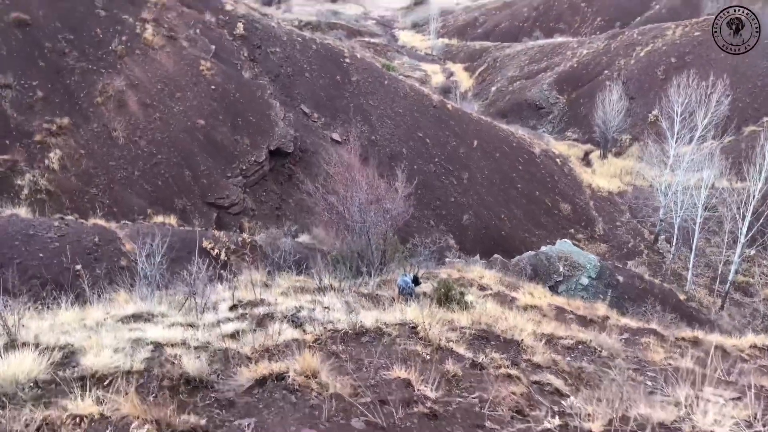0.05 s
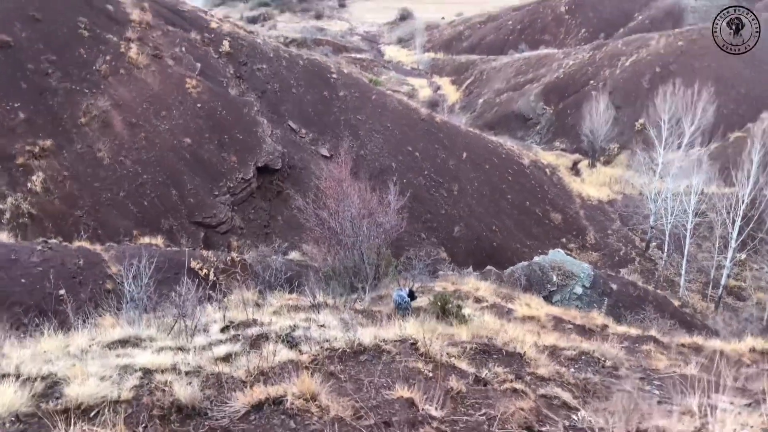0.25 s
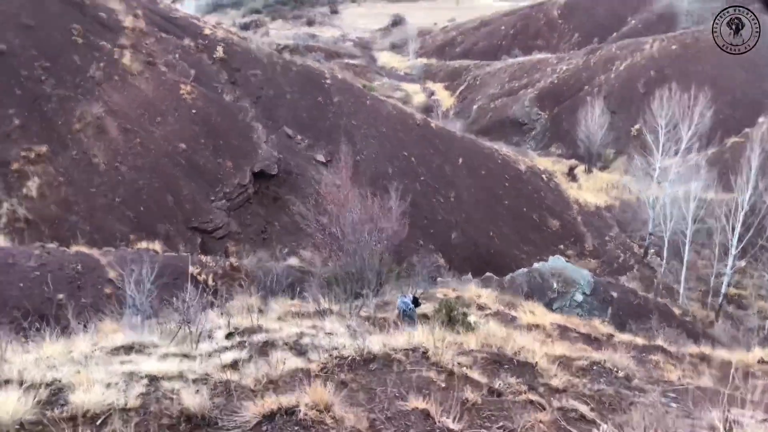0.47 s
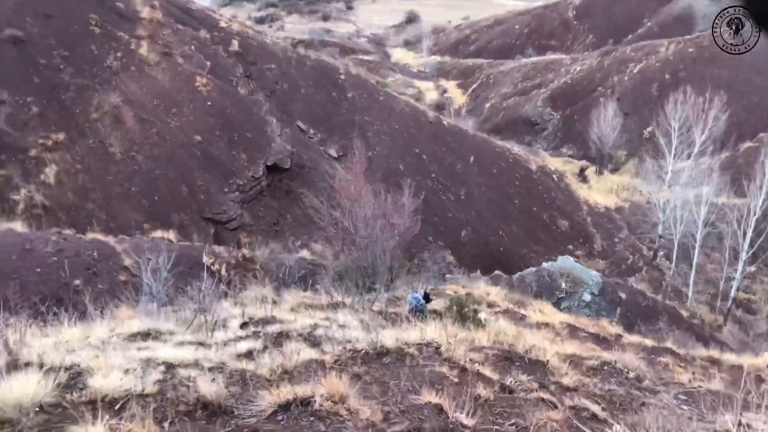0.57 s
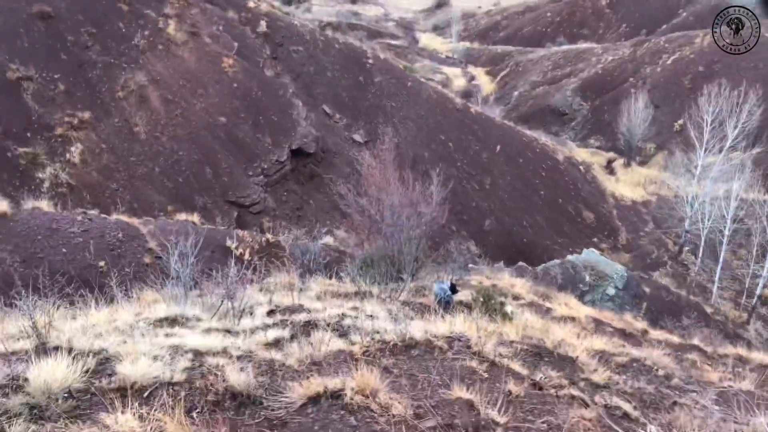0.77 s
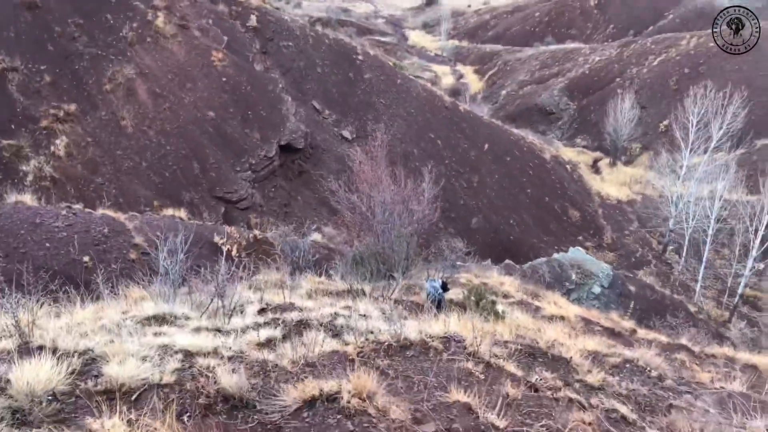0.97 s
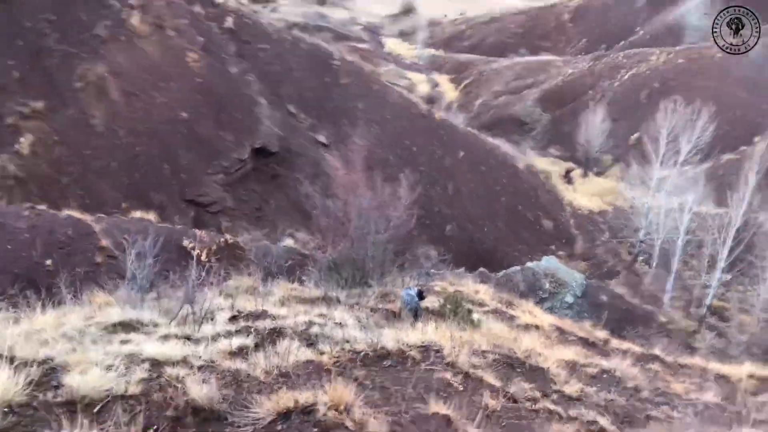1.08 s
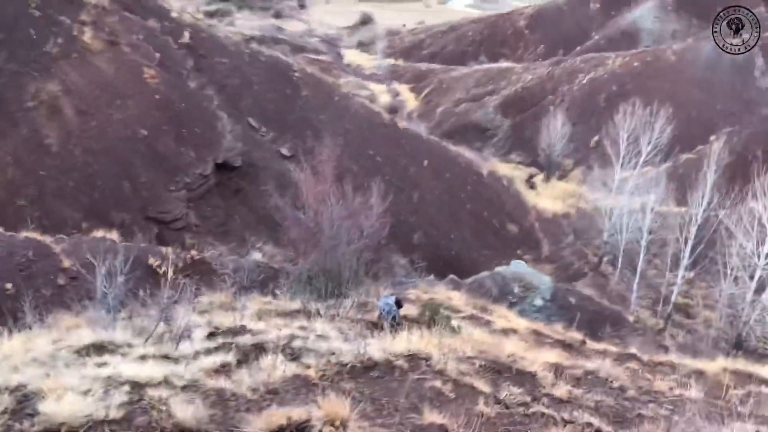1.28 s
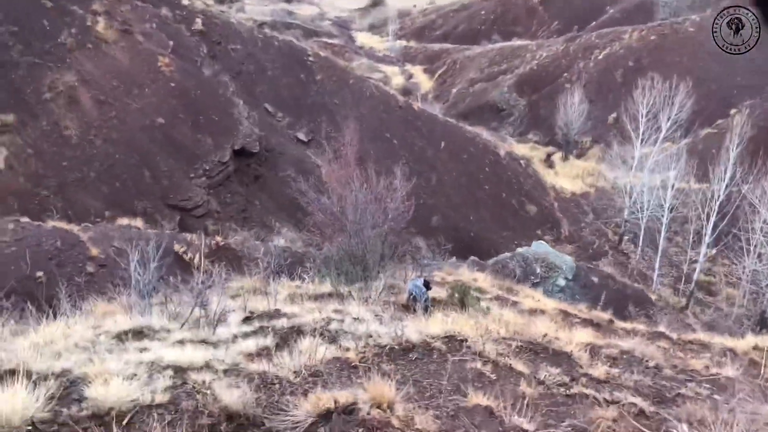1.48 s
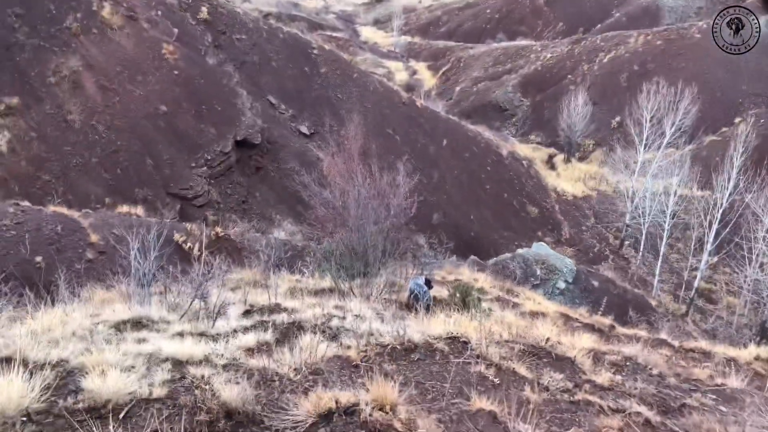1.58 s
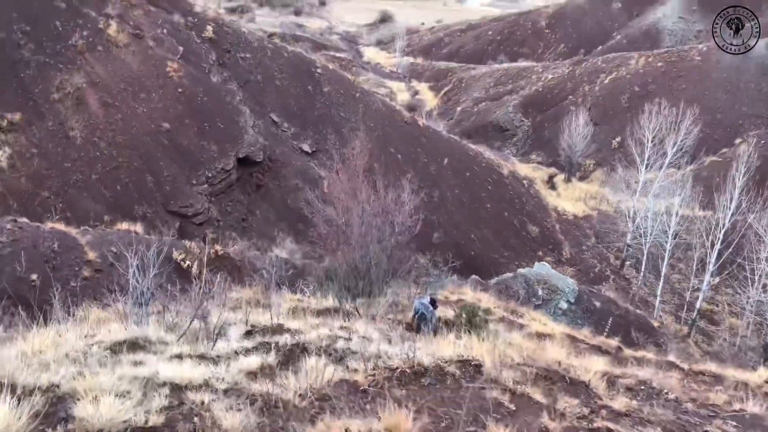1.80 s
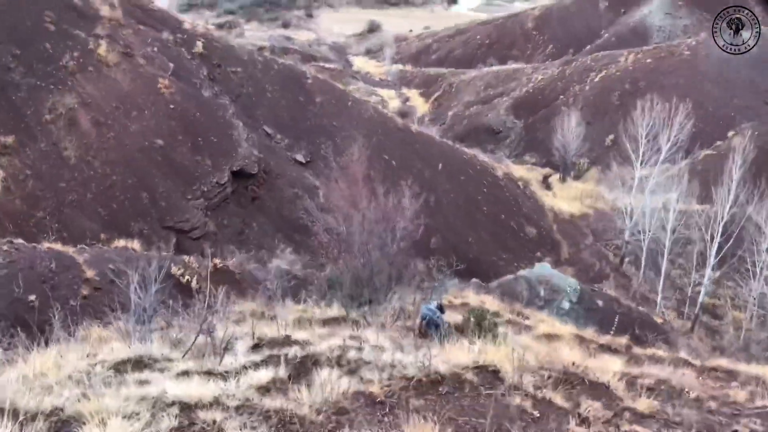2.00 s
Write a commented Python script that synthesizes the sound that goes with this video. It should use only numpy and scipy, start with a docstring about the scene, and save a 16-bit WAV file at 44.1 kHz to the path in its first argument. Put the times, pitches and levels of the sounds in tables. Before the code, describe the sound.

Light wind buffets the microphone and dies away, with faint ticks of dry grass.

```python
"""A dry, grassy hillside, one microphone in faint open air.
A light gust buffets the microphone: each eddy is a soft thump that falls in pitch, over a low rumble
and flutter, and the wind then dies away. Close by, as if under shifting feet, dry stalks snap in
short ticks, and grass and grit rustle with dense grains of tiny fractures."""
import sys
import numpy as np
from scipy import signal
from scipy.fft import rfft, irfft
from scipy.io import wavfile
from scipy.ndimage import uniform_filter1d

SR = 44100
rng = np.random.default_rng(int(sys.argv[2]) if len(sys.argv) > 2 else 0)


def master_out(mix):
    """Clip the mix to full scale and print it as 16-bit PCM to the path in sys.argv[1]."""
    frames = np.transpose(np.atleast_2d(mix))
    ceiling = np.clip(frames, -1, 1)
    pcm = np.round(ceiling * 32767).astype(np.int16)
    wavfile.write(sys.argv[1], SR, pcm)


N = 90404

# spectrum of dry grass breaking close to the microphone: frequency_hz, density_db
GRASS_SPECTRUM = [(200, -7.5), (600, 3), (1300, 1), (2000, -3.5), (3500, -1), (5000, -3.5), (8000, -6),
                  (11000, -12), (16000, -25)]
# rise and fall of the fine crackle: time_s, level_db
CRACKLE_LEVEL = [(0, -62), (.3, -62.5), (.45, -67), (.62, -69), (.85, -70), (1.02, -74.5), (1.07, -65),
                 (1.2, -67), (1.3, -72), (1.42, -64.5), (1.6, -69.5), (1.85, -67), (2.05, -69.5)]


def undb(db):
    """Decibels to gain."""
    return 10 ** (np.asarray(db) / 20)


def unit(x):
    """Scale to rms 1."""
    return x / np.sqrt(np.mean(x ** 2))


def curve(rows):
    """Gain over time from rows of time_s, level_db."""
    time_s, level_db = np.array(rows).T
    return undb(np.interp(np.arange(N) / SR, time_s, level_db))


def colour(x, rows):
    """Filter by rows of frequency_hz, density_db, then scale to rms 1."""
    hz, db = np.array(rows).T
    bins_hz = np.maximum(np.arange(N // 2 + 1) * SR / N, 1)
    gain = undb(np.interp(np.log(bins_hz), np.log(hz), db))
    return unit(irfft(rfft(x) * gain, N))


def wander(rate_hz):
    """Smooth random drift of rms 1."""
    hold = int(SR / rate_hz)
    steps = np.repeat(rng.standard_normal(N // hold + 1), hold)
    return unit(uniform_filter1d(steps, hold)[:N])


def add(out, at_s, sound):
    """Mix in a sound centred on a time."""
    i = int(round(at_s * SR)) - len(sound) // 2 + np.arange(len(sound))
    inside = (i >= 0) & (i < N)
    out[i[inside]] += sound[inside]


def open_air():
    """The faint, slightly wavering hush of the hillside all around."""
    # spectrum of the hush: frequency_hz, density_db
    air_spectrum = [(20, -36), (50, 7.5), (100, -0.5), (190, 5), (450, 0.5), (800, -7), (1300, -11),
                    (2300, -16), (3900, -16), (6500, -20), (10000, -27), (16000, -31)]
    # its slow rise and fall: time_s, level_db
    air_level = [(0, -62.5), (.35, -61.5), (.7, -62), (1.0, -66), (1.12, -60.5), (1.45, -63.5), (1.59, -66),
                 (1.83, -63), (2.05, -64.5)]
    flicker_db = 0.04
    hush = colour(rng.standard_normal(N), air_spectrum) * curve(air_level)
    return hush * undb(flicker_db * wander(rate_hz=26.2))


def grains(per_s, scatter_db):
    """Tiny fractures in dry grass: impulses of random time, size and sign."""
    hits = rng.random(N) < per_s / SR
    sizes = undb(scatter_db * np.minimum(rng.exponential(size=N), 5))
    return colour(hits * sizes * rng.choice([-1, 1], N), GRASS_SPECTRUM)


def grass_rustle():
    """Close scuffs of dense grains, each with its own crunchy resonance, over a fine crackle."""
    # scuffs through dry grass: start_s, length_s, level_db, crunch_hz
    scuffs = [(0.068, 0.01, -72, 3600), (.155, 0.0053, -53.5, 10100), (0.24, 0.016, -66, 7000),
              (0.502, 0.015, -50, 2450), (0.529, 0.0055, -55.5, 3920), (0.585, .012, -60.5, 4030),
              (1.393, 0.027, -58, 1330), (1.446, 0.089, -68.5, 10400), (1.465, .045, -69, 3920),
              (1.545, 0.013, -61.5, 6500), (1.618, 0.026, -57, 3720), (1.655, 0.028, -66, 5500),
              (1.807, 0.017, -62.5, 1300), (1.831, 0.028, -65, 3900), (1.946, 0.013, -63.5, 1600)]
    attack_s, release_s, crunch_db = 0.0061, 0.0071, 2.5
    t = np.arange(N) / SR
    out = curve(CRACKLE_LEVEL) * grains(per_s=2500, scatter_db=3.5)
    dense = grains(per_s=11000, scatter_db=-0.5)
    for start_s, length_s, level_db, crunch_hz in scuffs:
        attack = np.clip((t - start_s) / attack_s, 0, 1)
        release = np.exp(-np.maximum(t - start_s - length_s, 0) / release_s)
        crunch = signal.lfilter(*signal.iirpeak(crunch_hz, Q=5.1, fs=SR), dense)
        out += undb(level_db) * attack * release * unit(dense + undb(crunch_db) * crunch)
    return out


def eddy(pitch_hz, fall_cycles):
    """One eddy passing the microphone port: a few pressure swings, each slower than the last."""
    period_growth, rise_cycles = 0.72, 0.64  # growth in seconds of period per second
    t = np.arange(-4000, 4000) / SR
    cycles = np.log(np.maximum(1 + period_growth * pitch_hz * t, 1e-6)) / period_growth
    envelope = np.exp(-.5 * (cycles / np.where(cycles < 0, rise_cycles, fall_cycles)) ** 2)
    return envelope * np.cos(2 * np.pi * cycles) * signal.windows.tukey(len(t), .5)


def wind_on_microphone():
    """Eddies thump over a low rumble that follows the gust and breaks into flutter at its crests."""
    # eddies striking the microphone, each at its peak: time_s, level_db, pitch_hz, fall_cycles
    buffets = [(0.038, -45, 78.5, 0.55), (0.133, -42, 137, 0.96), (.1555, -42, 550, 0.47),
               (0.1824, -32, 231, 1), (0.2109, -39, 560, 1.2), (0.2167, -32, 287, 0.36),
               (.2362, -32, 427, 1.1), (.2392, -24, 240, 0.58), (0.2486, -36.5, 560, 0.9),
               (0.2628, -33, 266, 1.07), (0.2823, -14, 355, 1.09), (.2951, -48, 143, 0.33),
               (0.424, -37, 117.5, 0.56), (0.4488, -42, 89, 1.3), (0.522, -46, 78, .7),
               (0.622, -31.5, 473, 0.94), (0.626, -27, 212, 1.14), (0.6482, -33.5, 103, .8),
               (0.6607, -28.5, 89, 0.49), (0.6902, -30.5, 133, 0.96), (.7905, -36.5, 258, 1.2),
               (.9349, -42, 145, 1.6), (1.019, -37.5, 91, .7), (1.474, -51, 72, 0.73),
               (1.745, -49.5, 73, 0.72)]
    # strength of the rumble through the gust: time_s, level_db
    gust_level = [(0, -69), (.1, -64.5), (.17, -50.5), (.25, -37.5), (.33, -48), (.38, -49), (.45, -44.5),
                  (.52, -42.5), (.59, -53), (.67, -42.5), (.75, -49.5), (.8, -52), (.86, -57.5), (.92, -43),
                  (.98, -50), (1.02, -51), (1.14, -50), (1.21, -63), (1.36, -84), (2.05, -66.5)]
    # spectrum of the rumble: frequency_hz, density_db
    rumble_spectrum = [(20, -19), (40, -2.5), (70, 2), (110, -0.5), (175, -1.5), (240, -18), (330, -26.5),
                       (600, -43), (1500, -83)]
    # bursts of flutter at the crests: centre_s, half_length_s, level_db
    flutter_bursts = [(0.181, 0.0075, -43.5), (0.213, 0.0068, -34.5), (0.24, 0.0068, -38.5),
                      (0.256, 0.0061, -36), (.632, 0.015, -41.5), (0.649, 0.0056, -45.5), (0.7, 0.016, -51),
                      (0.785, .011, -50), (0.907, 0.0049, -52.5), (1.023, 0.0075, -52.5),
                      (1.11, 0.061, -57), (1.825, 0.029, -61.5)]
    # spectrum of the flutter: frequency_hz, density_db
    flutter_spectrum = [(40, -34), (130, -17.5), (220, 9), (380, -1.5), (560, -10), (760, -18), (1000, -38),
                        (1600, -65)]
    port_low_hz, port_high_hz, flicker_db = 41.7, 1060, 0.5
    t, thumps = np.arange(N) / SR, np.zeros(N)
    for time_s, level_db, pitch_hz, fall_cycles in buffets:
        add(thumps, time_s, undb(level_db) * eddy(pitch_hz, fall_cycles))
    low_cut = signal.butter(3, port_low_hz, "high", fs=SR, output="sos")
    high_cut = signal.butter(4, port_high_hz, fs=SR, output="sos")
    thumps = signal.sosfiltfilt(np.vstack([low_cut, high_cut]), thumps)
    rumble = colour(rng.standard_normal(N), rumble_spectrum) * curve(gust_level)
    rumble *= undb(flicker_db * wander(rate_hz=29.16))
    crests = sum(undb(level_db) * np.exp(-.5 * ((t - centre_s) / half_length_s) ** 2)
                 for centre_s, half_length_s, level_db in flutter_bursts)
    flutter = crests * colour(rng.standard_normal(N), flutter_spectrum)
    return thumps + rumble + flutter


def fibre_snap(pitch_hz, ring_cycles):
    """A breaking fibre: a pulse only a few cycles long."""
    cycles = pitch_hz * np.arange(-600, 600) / SR
    rise = np.exp(-.5 * (cycles / (0.75 * ring_cycles)) ** 2)
    fall = np.exp(-np.abs(cycles / ring_cycles) ** 1.44)
    return np.where(cycles < 0, rise, fall) * np.sin(2 * np.pi * cycles)


def dry_stalks():
    """Stalks break close by: clear snaps with a bright edge and a faint tail, among many small ones."""
    # the clear snaps: time_s, level_db, pitch_hz, ring_cycles
    snaps = [(0.0543, -47, 2480, 1), (.074, -39.5, 3660, 1.8), (0.0727, -39, 6960, 2),
             (.077, -41, 3540, 1.6), (.0835, -45, 4300, .8), (0.0924, -37.5, 6550, 1.3),
             (0.091, -52, 4500, .8), (0.099, -38, 2880, 0.8), (.1214, -36.5, 3360, 0.39),
             (.159, -51, 8000, .6), (.1654, -36.5, 8500, 0.96), (.256, -48, 6240, 1.2),
             (0.269, -39, 7200, 1.2), (.299, -43, 1690, 0.4), (.3045, -40, 5100, 1.14),
             (.3255, -45.5, 2200, 0.61), (.355, -44, 6500, .6), (0.5048, -44, 10700, .7),
             (0.5113, -36, 3120, 0.63), (.515, -39, 6500, 0.6), (0.519, -47, 2400, 1.2),
             (0.5207, -31.5, 3070, 0.48), (.5266, -40, 3840, 0.87), (.598, -50, 2000, 0.48),
             (0.609, -42.5, 4540, 0.65), (0.689, -42, 4970, 0.58), (.762, -49.5, 6550, 0.86),
             (.7685, -40, 2950, 0.31), (.8141, -40, 2350, 0.44), (0.8394, -43, 3580, 0.44),
             (.869, -50.5, 7100, 1.5), (0.8974, -41, 7000, 0.4), (0.9871, -34.5, 5150, 1.03),
             (1.0927, -44.5, 4300, 1), (1.195, -47, 4740, 1.8), (1.3334, -42.5, 4900, 0.85),
             (1.399, -47, 3000, 0.64), (1.405, -48, 8450, .7), (1.456, -44, 9800, 0.51),
             (1.475, -35.5, 4360, 0.6), (1.5465, -34, 6760, 0.79), (1.6217, -42.5, 3300, 1),
             (1.6804, -45.5, 5700, 1.9), (1.7615, -32.5, 5000, 0.7), (1.93, -35.5, 4300, 1.45)]
    edge_db, tail_db, tail_s = -19.5, -20, 0.003
    small_per_s, small_hz, spread_octaves = 90, 4920, 0.73
    out, crackle = np.zeros(N), curve(CRACKLE_LEVEL)
    tail_noise = colour(rng.standard_normal(N), GRASS_SPECTRUM)
    edge = undb(edge_db) * fibre_snap(pitch_hz=9900, ring_cycles=0.55)
    t = (np.arange(len(edge)) - len(edge) // 2) / SR
    tail_envelope = undb(tail_db) * (t > 0) * np.exp(-np.abs(t) / tail_s)
    for k, (time_s, level_db, pitch_hz, ring_cycles) in enumerate(snaps):
        tail = np.roll(tail_noise, k * len(t))[:len(t)] * tail_envelope
        add(out, time_s, undb(level_db) * (fibre_snap(pitch_hz, ring_cycles) + edge + tail))
    for when, pitch, size in rng.random((int(small_per_s * N / SR), 3)):
        gain = crackle[int(when * N)] * undb(8 + 8 * size)  # 8 to 16 dB above the fine crackle
        pitch_hz = small_hz * 2 ** (spread_octaves * (2 * pitch - 1))
        add(out, when * N / SR, gain * fibre_snap(pitch_hz, ring_cycles=0.84))
    return out


def scene():
    """Air, grass, wind and stalks at one microphone."""
    return (open_air() + grass_rustle() + wind_on_microphone() + dry_stalks())[None]


def record(dry):
    """The recorder cuts the highest treble steeply."""
    top_hz = 15800
    return signal.sosfilt(signal.ellip(10, .2, 70, top_hz, fs=SR, output="sos"), dry)


dry = scene()
out = record(dry)
master_out(out)
```